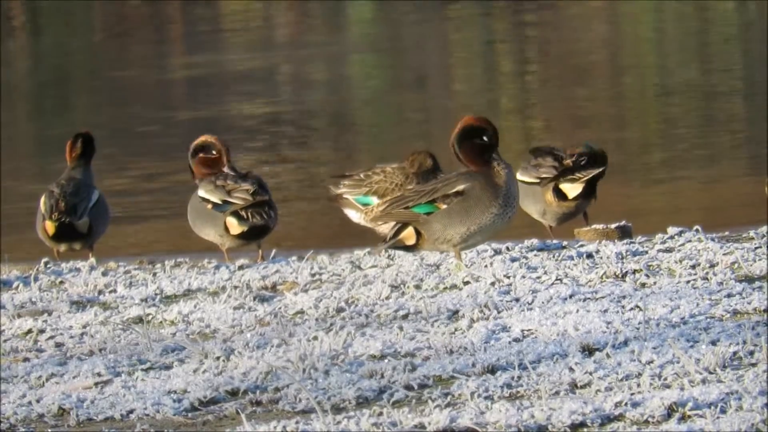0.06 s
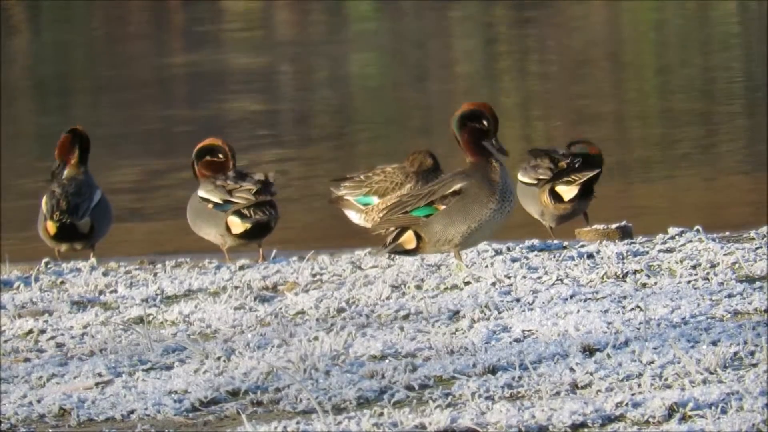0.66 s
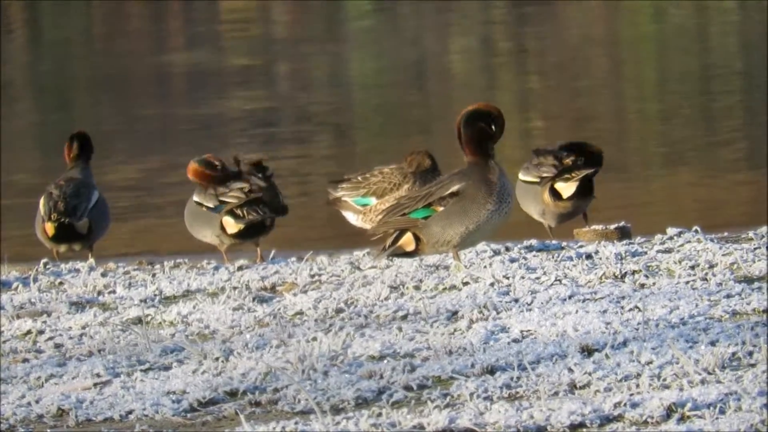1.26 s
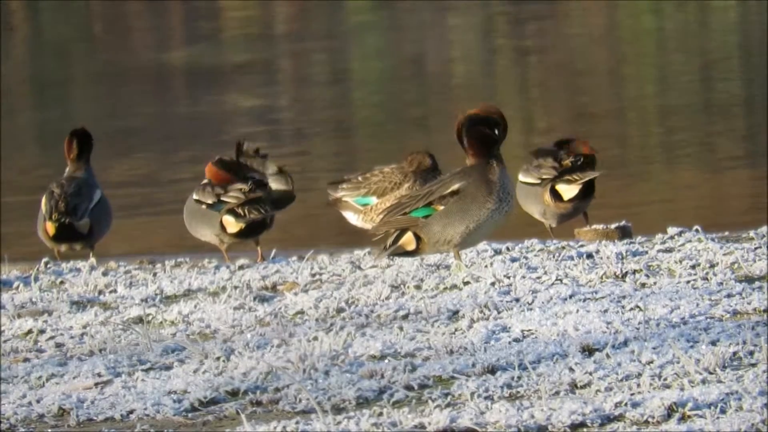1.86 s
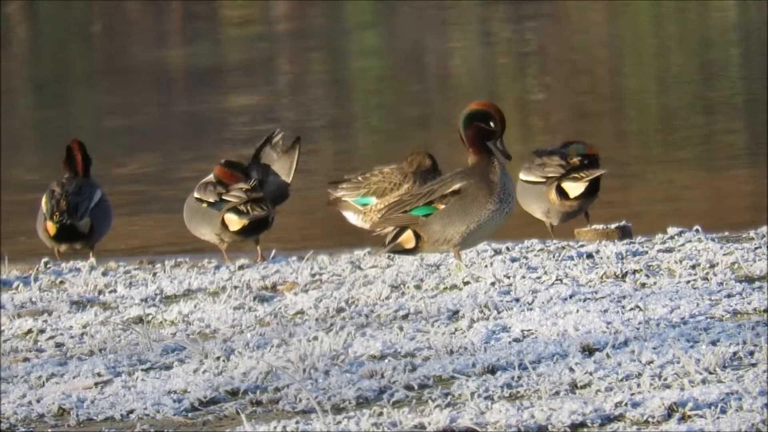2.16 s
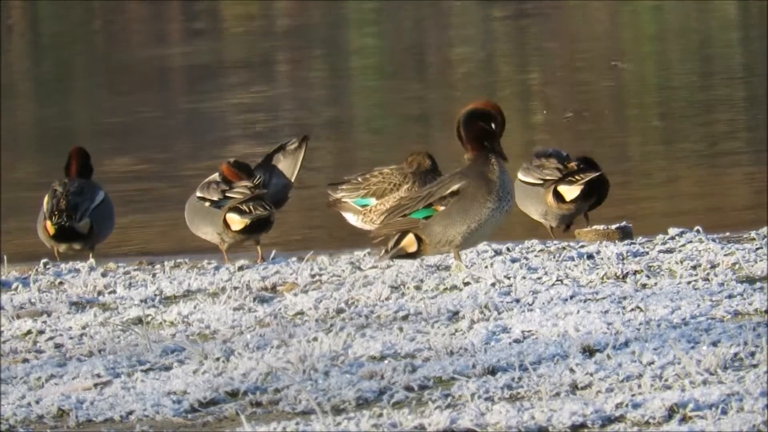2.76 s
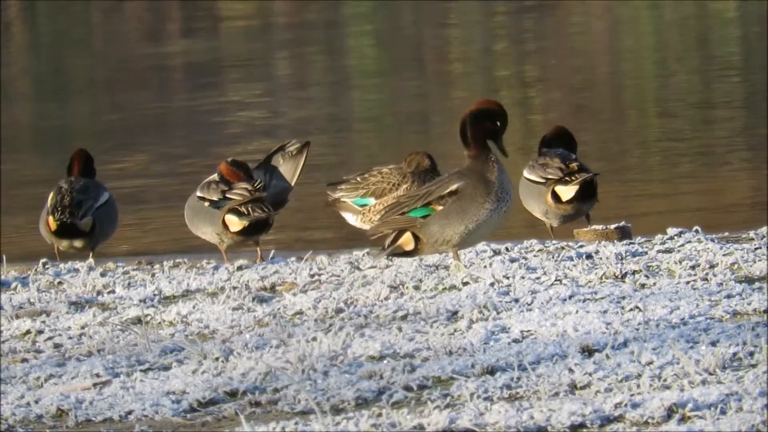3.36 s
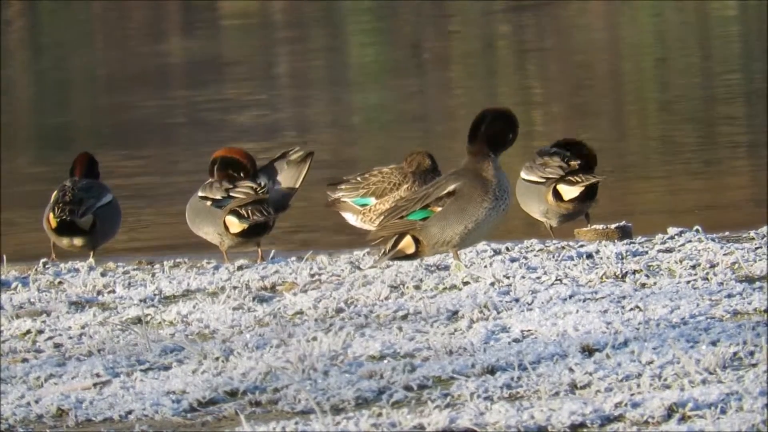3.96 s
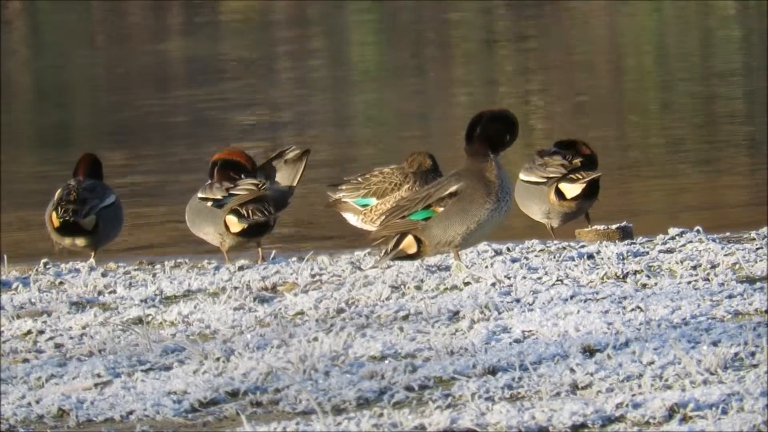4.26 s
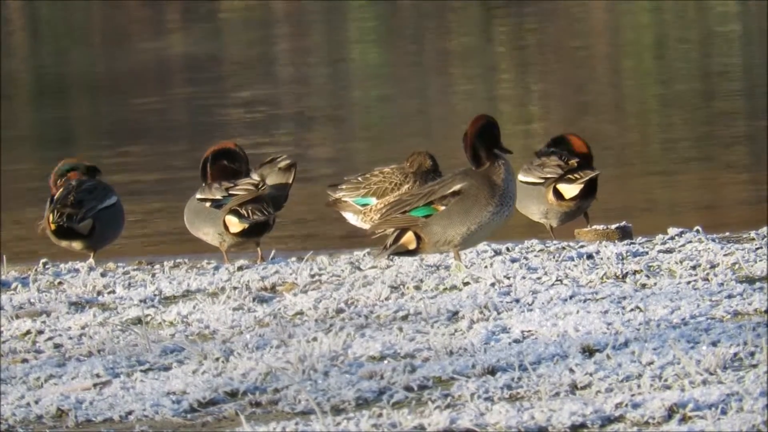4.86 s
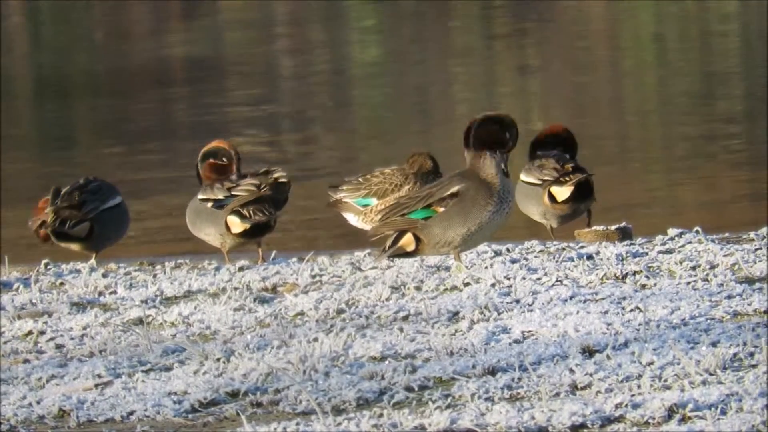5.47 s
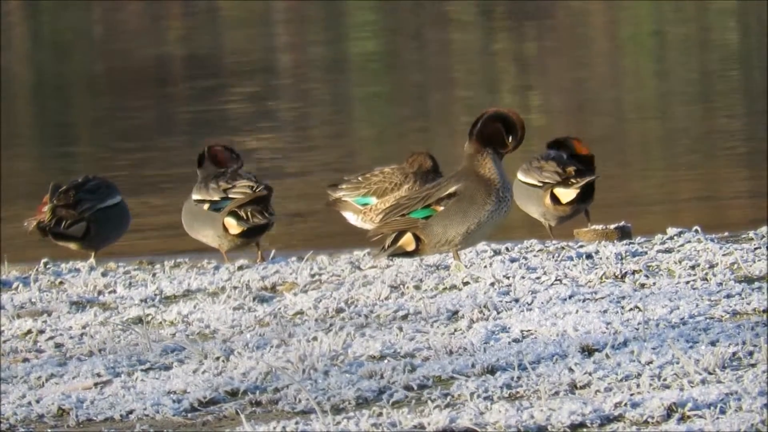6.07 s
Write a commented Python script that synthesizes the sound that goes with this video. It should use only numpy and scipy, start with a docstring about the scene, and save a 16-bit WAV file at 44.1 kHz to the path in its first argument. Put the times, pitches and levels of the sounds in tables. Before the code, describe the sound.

A low, steady rumble of distant traffic runs under ducks on an open shore. A soft, short whistle sounds at the very start, followed by faint far peeps and hoots. From 1.3 to 2.9 seconds a nearer duck gives about eight brief throaty clucks. Bright, high whistles, each a tiny hiss breaking into a pure note, stand out at 1.7 and 2.6 seconds as the loudest sounds. A second duck whistles lower and more softly at 2.4 and 3.7 seconds. Between about 2.8 and 4.5 seconds a small bird ticks faintly, among a few distant waterfowl hoots. At 4.6 seconds everything drops out abruptly, then swells back within a second. The clucking returns with it, from about 4.9 seconds to the end just after 6, with a third bright whistle at 5.6. The birds sound near the centre, with little echo.

```python
"""Teal on a frosty shore

A drake clucks in short throaty runs, membrane pulses ringing in his throat; three times a hiss of
air breaks into a bright whistle. A second duck whistles lower and farther off, among faint ticks,
peeps and hoots. Underneath sit a steady rumble of distant traffic and a trace of breeze.
Late on, the whole mix drops out at once and swells back within a second."""
import sys
import numpy as np
from scipy import signal
from scipy.fft import rfft, irfft
from scipy.io import wavfile

SR = 44100
rng = np.random.default_rng(int(sys.argv[2]) if len(sys.argv) > 2 else 0)


def unload_wav(signal):
    """Save mono or channel-first audio to the path in sys.argv[1] as 16-bit WAV at rate SR, clipped to [-1, 1]."""
    wavfile.write(
        sys.argv[1],
        SR,
        np.round(np.clip(np.atleast_2d(signal).T, -1, 1) * 32767).astype(np.int16),
    )


N = 269892
T = np.arange(N) / SR

# the drake's whistle cues: start_s, level_db, time_stretch
DRAKE_WHISTLES = [(1.7491, -20.2, 0.93), (2.6284, -19.5, 0.96), (5.5652, -21.5, 0.95)]
# the whistle's harmonics: harmonic_number, gain_db
WHISTLE_HARMONICS = [(1, -0.5), (2, -30.5), (3, -23.5), (4, -47.5)]
# three overlapping pushes of air per whistle, before stretching: crest_s, spread_s, relative_pressure
AIR_PUSHES = [(.003, 0.01, 0.6), (0.021, .0037, .75), (.051, 0.014, 1.0)]
# throat resonances in the hiss, timed from whistle onset: centre_hz, width_hz, gain_db, crest_s, spread_s
HISS_BANDS = [(3600, 900, -6, -0.051, 0.033), (5690, 600, -6.5, -0.014, 0.02),
              (3300, 1400, -2.5, 0.042, 0.029), (8250, 2900, -8, 0.038, .03), (4120, 440, -11, .10, 0.0201)]
# the drake's cluck cues: start_s, level_db, run_up_s, chest_gain_db
DRAKE_CLUCKS = [(1.3206, -36.5, 0.0014, -18), (1.4592, -35.5, 0.0026, -19), (1.6075, -35.4, 0.0031, -21),
                (1.9220, -36.5, 0.0029, -34), (2.0926, -36, 0.0034, -30), (2.271, -31, .0072, -15.5),
                (2.4691, -30.5, 0.0051, -31), (2.8579, -33, 0.017, -44), (4.859, -38.5, 0.0019, -20),
                (4.9988, -35.5, 0.0024, -30), (5.136, -35.5, 0.0025, -21), (5.2760, -36.5, 0.0028, -30),
                (5.4240, -36, 0.0024, -39), (5.7394, -37.5, 0.0027, -36), (5.9100, -35.5, 0.0034, -32),
                (6.0890, -31, 0.0066, -15.5)]
# throat resonances in a cluck: centre_hz, width_hz, gain_db, share_of_bill_boost
THROAT_FORMANTS = [(567, 277, 2, 0.02), (1247, 370, -6.5, 1.09), (1570, 234, -6.5, 1.38),
                   (2090, 420, -17.5, 0.42), (3650, 720, -17, 0.49)]
# the second duck's cues: start_s, level_db, base_pitch_hz
SECOND_DUCK_CALLS = [(0.038, -37, 1687), (2.41, -41.8, 1734), (3.688, -41, 1720)]
# the two pitch arches of its call: crest_s, sag_by_a_tenth_s, top_pitch_ratio, gain_db
PITCH_ARCHES = [(0.021, 0.0189, 0.97, -1.5), (0.057, 0.024, 0.99, 1.5)]
# the small bird's cues: start_s, level_db
BIRD_TICKS = [(1.17, -59), (1.98, -59), (2.845, -56), (3.03, -56.5), (3.232, -57.5), (3.421, -54.5),
              (3.621, -53.5), (3.789, -53.5), (3.965, -53.5), (4.128, -54), (4.294, -54.5), (4.503, -56.5),
              (5.02, -57), (5.795, -61.5)]
# faint peeps: start_s, level_db, pitch_hz
FAR_PEEPS = [(.272, -55.5, 3530), (.752, -58.5, 3620)]
# far waterfowl hoots: start_s, level_db, pitch_hz
FAR_HOOTS = [(.35, -55, 397), (.73, -55, 393), (2.925, -51, 642), (3.02, -50.5, 662), (3.385, -53, 790),
             (3.585, -49, 782), (4.37, -51, 607)]
# echoes off the banks: delay_s, gain_db
BANK_ECHOES = [(0.01, -27.5), (0.041, -60), (.071, -46.5)]
# tone colour of the traffic bed: frequency_hz, relative_db
TRAFFIC_SPECTRUM = [(15, -62.5), (25, -33.5), (82, -30.5), (174, -17), (248, -9), (392, -1.5), (449, -1),
                    (557, 1.5), (637, -1.5), (791, -4), (981, -8), (1320, -12), (3680, -16), (9990, -18),
                    (15800, -23.5)]
# stereo width of the bed: frequency_hz, side_minus_mid_db
TRAFFIC_WIDTH = [(30, -6.5), (70, -7.5), (180, -28.5), (700, -40.5), (1500, -40), (3000, -20),
                 (6000, -15.5), (15000, -13)]
# faint hums in the bed: pitch_hz, level_db
LOW_HUMS = [(60, -91), (185, -78)]


def drake_whistles(length_s=0.085, base_hz=2375, lift_hz=133.3, scoop_hz=68, lead_s=0.003, snap_s=0.0051):
    """Air builds as a hiss, the syrinx snaps open, and a pure note rides the pressure in level and pitch."""
    out = np.zeros(N)
    hiss_t = np.arange(-SR // 7, SR // 5) / SR
    snap_size = int(snap_s * SR)
    for start_s, level_db, stretch in DRAKE_WHISTLES:
        t = np.arange(int(length_s * stretch * SR)) / SR / stretch
        lift = np.minimum(pressure(t + lead_s) / 0.88, 1)   # pitch leads the level, then tops out
        scoop = swell(t, crest_s=0.012, spread_s=0.0037)   # a dip before the second push
        note = tone(base_hz + lift_hz * lift - scoop_hz * scoop, WHISTLE_HARMONICS, waver=0.0035)
        envelope = pressure(t) * gate(t, length_s, attack_s=.003, release_s=.006)
        shimmer_db = 0.43 * drift(900, len(t))
        add(out, start_s, note * envelope * from_db(level_db + shimmer_db))
        add(out, start_s + hiss_t[0], throat_hiss(hiss_t) * from_db(level_db - 26))
        snap = air(snap_size, centre_hz=4000, width_hz=2100) * np.hanning(snap_size)
        add(out, start_s - snap_s * 0.89, snap * from_db(level_db - 13))
    return out


def pressure(t):
    """Air pressure through one whistle: the sum of its pushes."""
    return sum(strength * swell(t, crest_s, spread_s) for crest_s, spread_s, strength in AIR_PUSHES)


def throat_hiss(t, grit_db=2.8):
    """A raspy hiss climbs in pitch as pressure builds, then goes on softly under the note at t = 0."""
    climb_hz = np.interp(t, [-0.099, -0.051], [2550, 4200])
    rasp = from_db(-3) * swell(t, crest_s=-0.046, spread_s=.03) * swept_air(climb_hz, width_hz=560)
    rush = sum(from_db(gain_db) * air(len(t), centre_hz, width_hz) * swell(t, crest_s, spread_s)
               for centre_hz, width_hz, gain_db, crest_s, spread_s in HISS_BANDS)
    return (rasp + rush) * from_db(grit_db * drift(340, len(t)))


def drake_clucks(chest_hz=230, chest_s=0.043):
    """Each cluck is a handful of pulses ringing in the throat, over a soft thump from the chest's push."""
    out = np.zeros(N)
    push = np.hanning(int(chest_s * SR))
    thump = push * np.sin(2 * np.pi * chest_hz * np.arange(len(push)) / SR)
    for start_s, level_db, run_up_s, chest_gain_db in DRAKE_CLUCKS:
        t = np.arange(SR // 20) / SR - run_up_s   # zero at the crest
        # a longer run-up means more effort: the bill opens wider and shuts sooner
        effort = np.interp(run_up_s, [0.002, .0056], [0, 1])
        closing_s = np.interp(effort, [0, 1], [0.012, .0075])
        pulses = membrane_pulses(t, run_up_s, closing_s)
        voice = throat_and_bill(pulses, t, closing_s, opening_db=7.5 * effort)
        voice_rms = np.sqrt(np.sum(voice ** 2) / ((run_up_s + closing_s) * SR))
        add(out, start_s, from_db(level_db) * voice / voice_rms)
        add(out, start_s - chest_s / 3, from_db(level_db + chest_gain_db) * thump)
    return out


def membrane_pulses(t, run_up_s, closing_s, crest_hz=545.4, last_hz=662, jitter=.15, rasp_db=-27):
    """Uneven, raspy membrane pulses speed up exponentially to the crest, then a little more."""
    rate_hz = np.interp(t, [0, closing_s], [crest_hz, last_hz]) * np.exp(45 * np.minimum(t, 0))
    cycle = np.floor(np.cumsum(rate_hz * (1 + jitter * drift(600, len(t)))) / SR)
    force = from_db(np.interp(t, [-run_up_s, 0, closing_s], [-10, 0, -9])) * (t < closing_s)
    rasp = from_db(rasp_db) * rng.standard_normal(len(t))
    return force * (np.diff(cycle, prepend=-1) + rasp)


def throat_and_bill(pulses, t, closing_s, opening_db, open_hz=1400, shut_hz=683, drop_s=0.0031):
    """The throat rings; as the bill closes, the upper formants fade first and one resonance dives."""
    boost_db = opening_db + 7 * np.interp(t, [0, closing_s], [.35, -.65])
    throat = sum(resonate(pulses * from_db(gain_db + share * boost_db), centre_hz, width_hz) * (-1) ** k
                 for k, (centre_hz, width_hz, gain_db, share) in enumerate(THROAT_FORMANTS))
    dive_hz = shut_hz + (open_hz - shut_hz) / (1 + np.exp(t / drop_s))
    dive_hz *= 1 + 0.04 * opening_db   # a wider bill rings higher
    dive_db = -1.5 - 1198 * np.maximum(t - 0.0036, 0)   # dies away just after the crest
    bill = glide(pulses * from_db(dive_db), dive_hz, width_hz=340)
    return cut(cut(throat - bill, 350, "high"), 4800, "low")


def second_duck(length_s=.093, sag_loss_db=5):
    """A softer, lower whistle in two arches; it weakens wherever its pitch sags."""
    out = np.zeros(N)
    t = np.arange(int(length_s * SR)) / SR
    crest_s, sag_s, top_ratio, gain_db = np.transpose(PITCH_ARCHES)[:, :, None]
    sag_tenths = ((t - crest_s) / sag_s) ** 2
    bend = np.max(top_ratio - sag_tenths / 10, axis=0)
    contour_db = np.max(gain_db - sag_loss_db * sag_tenths, axis=0)
    envelope = from_db(contour_db) * gate(t, length_s, attack_s=0.0073, release_s=0.0094)
    for start_s, level_db, base_pitch_hz in SECOND_DUCK_CALLS:
        note = tone(base_pitch_hz * bend, harmonics=[(1, 0), (2, -37)], waver=.008)
        add(out, start_s, from_db(level_db) * note * envelope)
    return out


def small_bird(length_s=0.032, centre_hz=4130, rise_hz_per_s=47000):
    """Thin, hoarse ticks, each a quick upward sweep."""
    out = np.zeros(N)
    t = np.arange(int(length_s * SR)) / SR
    sweep_hz = centre_hz + rise_hz_per_s * (t - length_s / 2)
    for start_s, level_db in BIRD_TICKS:
        squeak = swept_air(sweep_hz, width_hz=1000)
        add(out, start_s, from_db(level_db) * squeak * np.hanning(len(t)) ** .5)
    return out


def far_calls(cues, length_s, width_hz):
    """Short hoarse notes, blurred by distance."""
    out = np.zeros(N)
    size = int(length_s * SR)
    for start_s, level_db, pitch_hz in cues:
        add(out, start_s, from_db(level_db) * air(size, pitch_hz, width_hz) * np.hanning(size) ** .5)
    return out


def shore_reverb(x, scatter_db, t60_s, dull_hz=1500, side_db=-16):
    """Adds faint echoes off the banks and a short, dull stereo scatter from the ground and reeds."""
    t = np.arange(SR // 2) / SR
    tail = cut(rng.standard_normal((2, len(t))), dull_hz, "low", order=1) * from_db(-60 * t / t60_s)
    passband_gain = np.sqrt(np.sum(tail ** 2, axis=1, keepdims=True) * SR / (np.pi * dull_hz))
    mid, side = from_db(scatter_db) * tail / passband_gain
    for delay_s, gain_db in BANK_ECHOES:
        add(mid, delay_s, from_db([gain_db]))
    response = mid + from_db(side_db) * side * [[1], [-1]]
    return x + signal.fftconvolve(x[None], response, axes=1)[:, :N]


def distant_traffic(level_db=-50, flutter_db=1.5, swell_db=0.25):
    """A near-mono bed of traffic rumble, restless in the low mids, with smooth hiss and faint hums."""
    hz = np.arange(N // 2 + 1) * SR / N
    colour = from_db(at_hz(TRAFFIC_SPECTRUM, hz))
    mid = irfft(rfft(rng.standard_normal(N)) * colour, N)
    side = irfft(rfft(rng.standard_normal(N)) * colour * from_db(at_hz(TRAFFIC_WIDTH, hz)), N)
    gain = from_db(level_db) / np.std(mid)
    movement = from_db(flutter_db * drift(18, N) + swell_db * drift(2.2, N))
    mid = mid + resonate(mid, centre_hz=770, width_hz=660) * (movement - 1)
    hum = sum(from_db(hum_db) * tone(np.full(N, pitch_hz), harmonics=[(1, 0)], waver=0.027)
              for pitch_hz, hum_db in LOW_HUMS)
    return gain * (mid + side * [[1], [-1]]) + hum


def breeze(steady_db=-98.5, puff_db=-69, puff_start_s=1.28, top_hz=36):
    """Breeze buffets the microphone in the sub-bass: a steady trace and one small puff."""
    puff = gate(T - puff_start_s, length_s=0.2, attack_s=.04, release_s=.04)
    buffeting = cut(cut(rng.standard_normal(N), top_hz, "low", order=3), 15, "high")
    return (from_db(steady_db) + from_db(puff_db) * puff) * rms_one(buffeting)


def tone(pitch_hz, harmonics, waver):
    """A slightly wavering tone on a pitch curve; a 0 dB harmonic has rms 1."""
    phase = 2 * np.pi * np.cumsum(pitch_hz * (1 + waver * drift(500, len(pitch_hz)))) / SR
    return np.sqrt(2) * sum(from_db(gain_db) * np.sin(round(k) * phase) for k, gain_db in harmonics)


def air(size, centre_hz, width_hz):
    """Air rushing through one steep-sided resonance; rms 1."""
    band = resonate(rng.standard_normal(size + 1000), centre_hz, 1.2 * width_hz)
    return rms_one(resonate(band, centre_hz, 1.2 * width_hz)[-size:])


def swept_air(centre_hz, width_hz):
    """Air rushing through a steep-sided, moving resonance; rms 1."""
    band = glide(rng.standard_normal(len(centre_hz)), centre_hz, width_hz)
    return rms_one(glide(band, centre_hz, width_hz))


def resonate(x, centre_hz, width_hz):
    """A resonance with peak gain 1."""
    r = np.exp(-np.pi * width_hz / SR)
    feedback = [1, -2 * r * np.cos(2 * np.pi * centre_hz / SR), r * r]
    return signal.lfilter(np.array([1, 0, -1]) * (1 - r * r) / 2, feedback, x)


def glide(x, centre_hz, width_hz):
    """A resonance whose centre follows a curve; peak gain 1."""
    turn = np.exp(2j * np.pi * np.cumsum(centre_hz) / SR)
    r = np.exp(-np.pi * width_hz / SR)
    return 2 * np.real(turn * signal.lfilter([1 - r], [1, -r], x / turn))


def cut(x, hz, kind, order=2):
    """Butterworth low- or high-pass."""
    return signal.sosfilt(signal.butter(order, hz, kind, fs=SR, output="sos"), x)


def swell(t, crest_s, spread_s):
    """A bell-shaped envelope of height 1."""
    return np.exp(-.5 * ((t - crest_s) / spread_s) ** 2)


def gate(t, length_s, attack_s, release_s):
    """Attack, hold and release, from time 0 to length_s."""
    return np.clip(np.minimum(t / attack_s, (length_s - t) / release_s), 0, 1)


def drift(rate_hz, size):
    """Smooth random wander of spread about 1."""
    knots = rng.standard_normal(size // 16 + 2)
    return np.interp(np.arange(size) * rate_hz / SR, np.arange(len(knots)), knots)


def at_hz(points, hz):
    """Read a spectrum on a log-frequency axis."""
    point_hz, value = np.transpose(points)
    return np.interp(np.log(hz + 1e-3), np.log(point_hz), value)


def add(out, start_s, sound):
    """Mix a sound in at its cue."""
    i = max(int(round(start_s * SR)), 0)
    out[i:i + len(sound)] += sound[:max(N - i, 0)]


def from_db(db):
    """Decibels to gain."""
    return 10 ** (np.asarray(db) / 20)


def rms_one(x):
    """Scale to unit rms."""
    return x / np.sqrt(np.mean(x ** 2) + 1e-20)


def scene():
    """The birds on the shore, a touch left of centre, over traffic and breeze."""
    peeps = far_calls(FAR_PEEPS, length_s=.03, width_hz=170)
    hoots = far_calls(FAR_HOOTS, length_s=0.057, width_hz=47)
    birds = drake_whistles() + second_duck() + small_bird() + peeps + hoots
    birds = shore_reverb(birds, scatter_db=-26, t60_s=.35)
    clucks = shore_reverb(drake_clucks(), scatter_db=-15, t60_s=0.16)
    pan = from_db([[.1], [-.1]])
    return (birds + clucks) * pan + distant_traffic() + breeze()


def record(dry, drop_at_s=4.592, fall_s=0.0098, hold_s=.19, recovery_s=0.23, drop_db=-32.5, back_db=-0.87):
    """The mix drops out, holds, and swells back over a faint low noise floor; the extreme top is cut."""
    since_s = T - drop_at_s
    fall = np.clip(since_s / fall_s, 0, 1)
    still_down = np.exp(-np.maximum(since_s - hold_s, 0) / recovery_s)
    fader_db = fall * (back_db + (drop_db - back_db) * still_down)
    floor = from_db(-86) * rms_one(cut(rng.standard_normal(N), 70, "low", order=1))
    high_cut = signal.ellip(12, .1, 80, 15800, fs=SR, output="sos")
    return signal.sosfilt(high_cut, dry * from_db(fader_db) + floor)


dry = scene()
out = record(dry)
unload_wav(out)
```